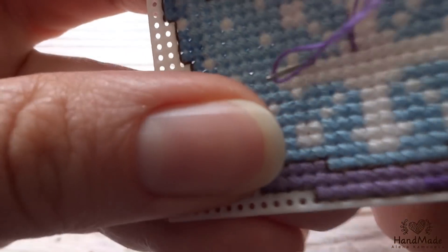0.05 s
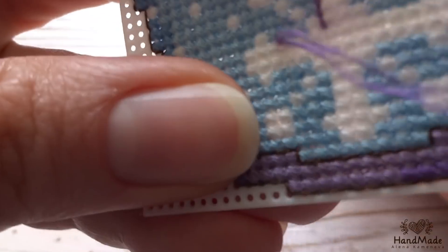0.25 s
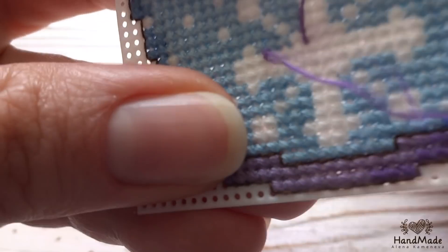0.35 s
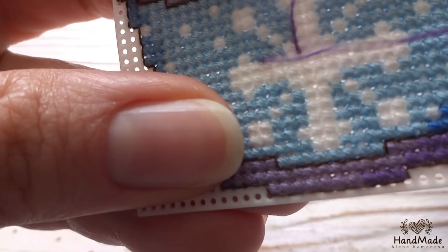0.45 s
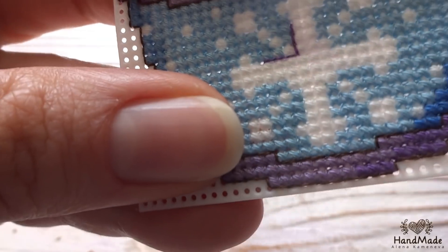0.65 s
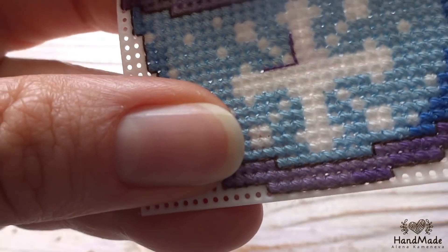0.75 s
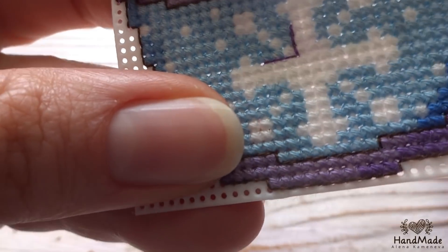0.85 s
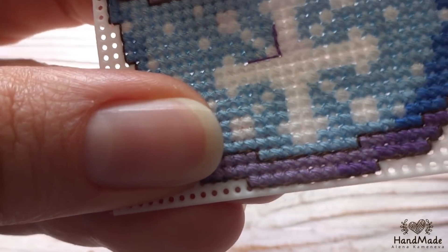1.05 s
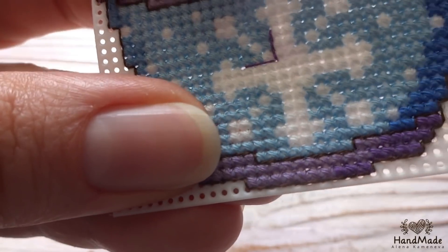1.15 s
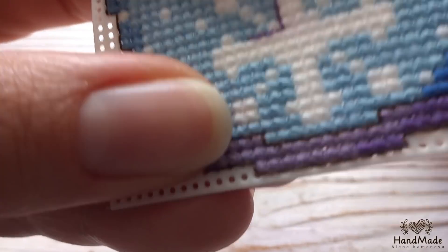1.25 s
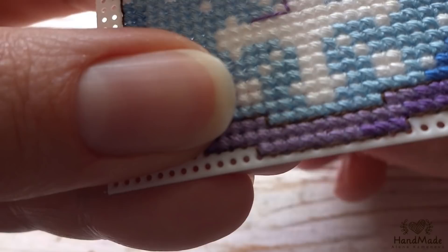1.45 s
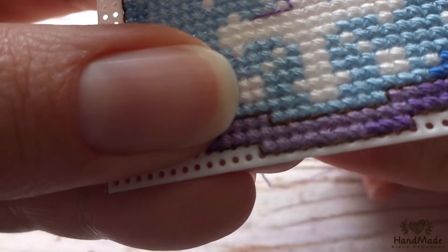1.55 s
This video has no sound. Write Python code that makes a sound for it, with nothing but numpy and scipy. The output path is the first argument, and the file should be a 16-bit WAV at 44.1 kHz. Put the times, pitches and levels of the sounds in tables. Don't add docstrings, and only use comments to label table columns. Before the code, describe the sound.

A needle and thread pass through stiff plastic canvas, with a crowded burst of sharp ticks, sheet pops and gritty rasp early on, then near quiet with a few faint clicks; close microphone in a hushed room.

```python
import sys
import numpy as np
from scipy import signal
from scipy.fft import rfft, irfft
from scipy.io import wavfile
from scipy.ndimage import uniform_filter1d

SR = 44100
rng = np.random.default_rng(int(sys.argv[2]) if len(sys.argv) > 2 else 0)


def transcribe(signal):
    frames = np.atleast_2d(signal).T
    limited = np.clip(frames, -1, 1)
    pcm = np.round(limited * 32767).astype(np.int16)
    wavfile.write(sys.argv[1], SR, pcm)


def gain_from_db(level_db):
    decades = np.asarray(level_db, float) / 20
    return 10 ** decades


N = 70560


def level(x, db):
    return x * gain_from_db(db) / np.sqrt(np.mean(x ** 2))


def butter(x, order, hz, kind="low"):
    return signal.lfilter(*signal.butter(order, hz, kind, fs=SR), x)


def fade(t, t60):
    return np.exp(-np.log(1000) * t / t60)


def colour(x, points):
    hz_points, db_points = np.array(points, float).T
    hz = np.arange(len(x) // 2 + 1) * SR / len(x) + 1
    gain_db = np.interp(np.log(hz), np.log(hz_points), db_points)
    return irfft(rfft(x) * gain_from_db(gain_db), len(x))


def ring(x, modes):
    t = np.arange(4096) / SR
    body = sum(gain_from_db(db) * np.sin(2 * np.pi * hz * t) * fade(t, t60) for hz, db, t60 in modes)
    return signal.fftconvolve(x, body)[:N]


def walk(rate):
    k = int(SR / rate)
    held = np.repeat(rng.standard_normal(N // k + 1), k)
    return 1.07 * uniform_filter1d(uniform_filter1d(held, k), k)[:N]


def add(out, at_s, shape):
    i = int(max(at_s, 0) * SR)
    out[i:i + len(shape)] += shape[:N - i]


def ticks():
    # (time [s], level [dB], rattle level [dB])
    tick_list = [(.0003, -26, -3), (0.0807, -7, -18.5), (0.1162, -25, 6), (.170, -11.5, -15.5),
                 (.1872, -27.5, -0.5), (0.211, -13, -10), (0.2948, -9, -20), (0.3139, 0.5, -17),
                 (0.3329, -24.5, -23), (0.3516, -12, -9), (0.398, -9, -9.5), (0.441, -28, -16),
                 (0.4809, -23.5, -16.5), (0.57, -48, -16), (0.8252, -27, -12), (.868, -30, -14),
                 (1.3708, -33, -10), (1.4341, -21.5, -13.5), (1.4999, -32.5, -7)]
    # (pitch [Hz], level [dB], time to fade 60 dB [s])
    rattle_bands = [(350, -14.5, 0.08), (635, -3.5, 0.033), (1000, -4.5, 0.065), (1351, 1, 0.031),
                    (2780, 0, 0.013), (4300, 0, .01), (10500, -26, .006)]
    snap_s, rebound_s, rebound_lag_s, rebound_size = .000026, .000065, 0.000096, 0.57
    out, t = np.zeros(N), np.arange(2048) / SR
    snap = np.exp(-((t - .0001) / snap_s) ** 2)
    rebound = rebound_size * np.exp(-((t - .0001 - rebound_lag_s) / rebound_s) ** 2)
    rise = 1 - np.exp(-t / 0.0007)
    for at, db, rattle_db in tick_list:
        rattle = np.zeros(len(t))
        for hz, band_db, t60 in rattle_bands:
            noise = butter(rng.standard_normal(len(t)), 2, [hz / 1.142, hz * 1.064], "band")
            rattle += gain_from_db(band_db) * level(noise, 0) * fade(t, t60)
        add(out, at, gain_from_db(db) * (rebound - snap + 0.44 * gain_from_db(rattle_db) * rattle * rise))
    return out


def pops():
    # (time [s], level [dB], pitch [Hz])
    pop_list = [
        (0.0188, -39.5, 350),
        (0.2159, -3.5, 1134),
        (.2873, 1, 1322),
        (0.2898, -14, 420),
        (0.4873, -36, 265),
    ]
    fade_cycles = 0.32
    out, t = np.zeros(N), np.arange(2048) / SR
    for at, db, hz in pop_list:
        soft_start = 1 - np.exp(-(t * hz / .17) ** 2)
        swing = np.sin(2 * np.pi * hz * t) * np.exp(-t * hz / fade_cycles / 2) * soft_start
        add(out, at, 1.58 * gain_from_db(db) * swing)
    return out


def chatter():
    # (time [s], length [s], level [dB], brightness [Hz])
    bunches = [(0.113, 0.009, -26, 1100), (0.3039, 0.0025, -5, 13780), (.306, 0.0013, -19.5, 8930),
               (0.3115, 0.00041, -15.5, 5000), (0.3142, 0.00092, -8.5, 15900),
               (0.3157, 0.0016, -25.5, 6000), (0.3227, 0.00292, -17, 6060), (0.3292, .002, -23.5, 2000),
               (0.3346, 0.00072, -22, 5000), (0.362, 0.0086, -33.5, 4000), (.846, 0.0025, -45, 5000),
               (1.443, .004, -62, 12000)]
    # (pitch [Hz], level [dB], time to fade 60 dB [s])
    mesh_modes = [(1150, -6, .008), (4000, 5, .0035), (6950, 1, .003), (11800, -4, .0012)]
    # (pitch [Hz], level [dB], time to fade 60 dB [s])
    sheet_modes = [(170, -7, 0.069), (350, -13.5, 0.085), (670, -14, 0.087), (961, -2.5, 0.066),
                   (1290, 4.5, 0.021), (2270, -7.5, 0.033), (3765, -8.5, .015)]
    slips_per_s = 7000
    slips, t = np.zeros(N), np.arange(1024) / SR
    for at, length, db, hz in bunches:
        slipping = rng.random(len(t)) < slips_per_s / SR
        chance = rng.random(len(t))
        kick = np.sign(chance - .5) * (0.19 + chance)
        train = slipping * kick * np.exp(-(t / length) ** 4)
        add(slips, at, gain_from_db(db) * butter(train, 2, min(hz, 20000)))
    crack = butter(slips, 1, 2500, "high")
    return 3.41 * crack + .5 * ring(slips, mesh_modes) + 0.091 * ring(slips, sheet_modes)


def thread():
    # (time [s], level [dB])
    drag = [(0, -47.5), (0.028, -54), (.212, -55.5), (0.219, -40), (.28, -33.5), (0.302, -29.5),
            (0.331, -27), (.37, -50), (.41, -45.5), (0.458, -55), (0.519, -48), (.6, -56.5), (.75, -60),
            (.8, -63.5), (1.38, -77), (1.44, -57), (1.52, -58.5), (1.6, -57)]
    # (time [s], level [dB])
    speed = [(0, -54.5), (.07, -54), (.1, -55), (.18, -63), (.21, -57), (.24, -50), (.282, -51),
             (.289, -71.5), (.305, -41), (.36, -46), (.46, -57), (.5, -54), (.75, -62), (.78, -66.5),
             (1.4, -76), (1.45, -61), (1.52, -67.5), (1.6, -60.5)]
    # (pitch [Hz], level [dB per Hz])
    rasp_tone = [(60, -32.5), (170, -14.5), (350, -13), (1200, -6), (2000, -14), (3900, -17), (7000, -28.5),
                 (15000, -47)]
    # (pitch [Hz], level [dB per Hz])
    hiss_tone = [(1800, -25), (3500, -7), (7700, -15), (10000, -6.5), (15500, -16.5)]
    t = np.arange(N) / SR
    grains = rng.standard_normal(N) * gain_from_db(2.5 * rng.exponential(size=N))
    rasp_db = np.interp(t, *np.array(drag).T) + 2.0 * walk(250)
    hiss_db = np.interp(t, *np.array(speed).T) + 2.6 * walk(120)
    rasp = level(colour(grains, rasp_tone), 0) * gain_from_db(rasp_db)
    hiss = level(colour(rng.standard_normal(N), hiss_tone), 0) * gain_from_db(hiss_db)
    return rasp + hiss


def room():
    # (pitch [Hz], level [dB per Hz])
    mid_tone = [(30, -55.5), (250, -16), (320, -15), (700, -16), (1200, -7.5), (2200, -11.5), (2900, -21.5),
                (15500, -32.5)]
    # (pitch [Hz], level [dB per Hz])
    side_tone = [(30, -70.5), (380, -16), (900, -15), (1200, -7), (2200, -17.5), (2800, -23.5),
                 (9400, -41.5), (15500, -70)]
    # (pitch [Hz], width [Hz], left level [dB], right level [dB])
    hz, width, left_db, right_db = (1535, 280, -50, -57.5)
    likeness = -.05
    lean, whistle_hz, whistle_db = 0.17, 15624, -74
    mid = level(colour(rng.standard_normal(N), mid_tone), -57)
    side = level(colour(rng.standard_normal(N), side_tone), -54)

    band = [hz - width / 2, hz + width / 2]
    left = level(butter(rng.standard_normal(N), 2, band, "band"), 0)
    other = level(butter(rng.standard_normal(N), 2, band, "band"), 0)
    right = likeness * left + np.sqrt(1 - likeness ** 2) * other
    whirr = np.array([left * gain_from_db(left_db), right * gain_from_db(right_db)]) * gain_from_db(.6 * walk(40))

    whistle = np.sqrt(2) * gain_from_db(whistle_db) * np.sin(2 * np.pi * whistle_hz * np.arange(N) / SR)
    return mid + lean * side + whistle + side * np.array([[1], [-1]]) + whirr


def space(x, db, t60, cut_hz):
    t = np.arange(N // 4) / SR
    tail = butter(rng.standard_normal(len(t)), 1, cut_hz) * fade(t, t60)
    return signal.fftconvolve(x, tail * gain_from_db(db) / np.sqrt(np.sum(tail ** 2)))[:N]


def scene():
    no_rumble = signal.butter(4, 200, "high", fs=SR, output="sos")
    hits = signal.sosfilt(no_rumble, ticks() + pops() + chatter())
    table_echo = space(hits, -18, .045, 5000.)
    room_echo = space(hits, -26.5, .4, 3000.)
    near = hits + thread() + table_echo + room_echo
    wide = np.roll(space(butter(near, 1, 700, "high"), -21, .02, 9000.), 90)
    hush = signal.sosfilt(signal.ellip(10, .2, 60, 15750, fs=SR, output="sos"), room())
    pan_db = -1.1
    return near * gain_from_db(np.array([[pan_db], [-pan_db]]) / 2) + wide * np.array([[1], [-1]]) + hush


def band_limit(x):
    return signal.sosfilt(signal.butter(12, 16520, fs=SR, output="sos"), x)


def record(dry):
    clipped = np.clip(dry, -1, 1)
    mix = signal.sosfilt(signal.ellip(10, .2, 60, 16400, fs=SR, output="sos"), clipped)
    return band_limit(mix)


dry = scene()
out = record(dry)
transcribe(out)
```